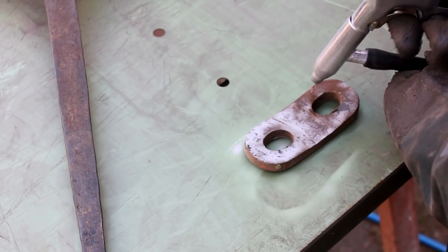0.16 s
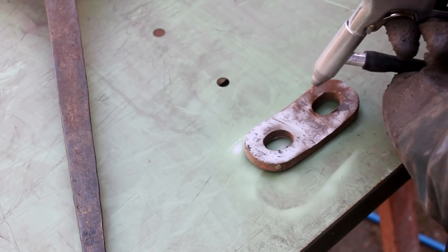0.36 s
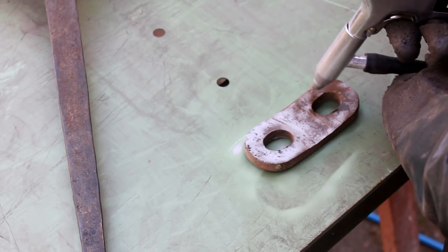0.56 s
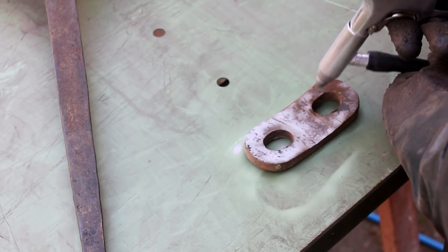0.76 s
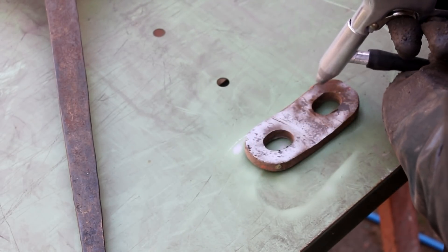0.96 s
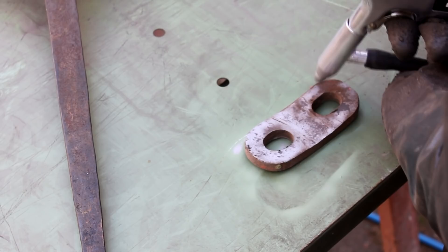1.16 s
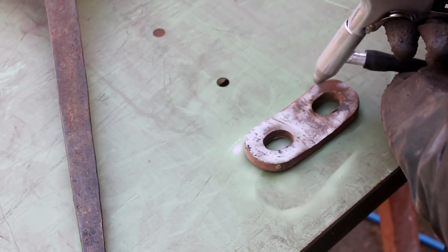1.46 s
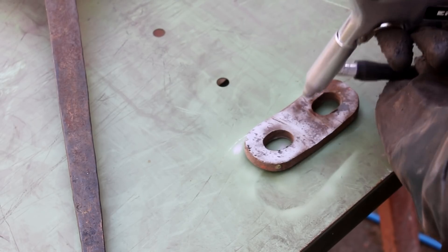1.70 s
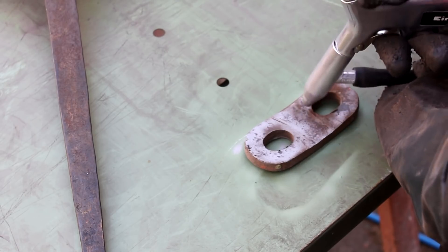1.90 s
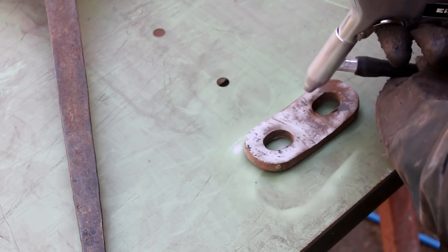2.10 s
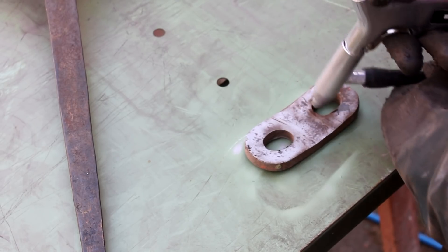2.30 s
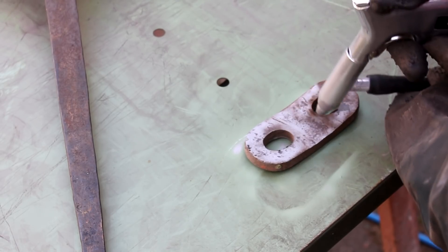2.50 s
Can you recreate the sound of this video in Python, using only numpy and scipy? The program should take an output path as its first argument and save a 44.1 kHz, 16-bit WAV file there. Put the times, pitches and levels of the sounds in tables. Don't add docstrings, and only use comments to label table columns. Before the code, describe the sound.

A sandblaster starts after a tenth of a second of quiet workshop murmur and a tiny trigger tick, then hisses continuously, bright and gritty, its tone shifting as the nozzle sweeps; close microphone, little echo.

```python
import sys
import numpy as np
from scipy import signal
from scipy.fft import rfft, irfft
from scipy.io import wavfile

SR = 44100
rng = np.random.default_rng(int(sys.argv[2]) if len(sys.argv) > 2 else 0)


def to_wav(sig):
    pcm = np.clip(np.atleast_2d(sig), -1, 1) * 32767
    pcm = np.round(pcm).astype(np.int16)
    wavfile.write(sys.argv[1], SR, pcm.T)


def gain_from_decibels(decibels):
    exponent = np.asarray(decibels, float) / 20
    return 10 ** exponent


N = 116865
OPEN_S = 0.1018


def evened(x):
    return x / np.sqrt(np.mean(x ** 2) + 1e-20)


def coloured(x, points):
    f, db = np.transpose(points)
    hz = np.fft.rfftfreq(len(x), 1 / SR)
    gain = gain_from_decibels(np.interp(np.log(hz + 1), np.log(f + 1), db))
    return evened(irfft(rfft(x) * gain, len(x)))


def track(table, column):
    rows = np.transpose(table)
    return np.interp(np.arange(N) / SR, rows[0], rows[column])


def drift(top_hz):
    t = np.arange(0, N + 64, 64) / SR
    wave = 0
    for f in np.geomspace(3, top_hz, 24):
        wave = wave + np.sin(2 * np.pi * (f * t + rng.random())) / np.sqrt(f)
    return np.interp(np.arange(N) / SR, t, evened(wave))


def ringing_air(hz, width_hz, level_db):
    turn = np.exp(2j * np.pi * np.cumsum(hz) / SR)
    r = np.exp(-np.pi * width_hz / SR)
    smooth = signal.lfilter([1], np.poly([r, r, r]), rng.standard_normal(N) / turn)
    return evened((turn * smooth).real) * gain_from_decibels(level_db)


def turbulence(points, level_db, gust_db):
    return coloured(rng.standard_normal(N), points) * gain_from_decibels(level_db + gust_db * drift(top_hz=50.24))


# frequency in Hz, level in dB.
ROOM_COLOUR = [(25, -11), (60, -1), (100, -4), (300, 2.5), (500, -10.5), (950, -9.5), (2470, -31.5),
               (15500, -50)]


def room_air():
    return gain_from_decibels(-64.5) * coloured(rng.standard_normal(N), ROOM_COLOUR)


# frequency in Hz, level in dB.
MACHINES = [(94, -72.5), (280, -73.5), (409, -77.5), (5400, -97)]


def machine_hum():
    t = np.arange(N) / SR
    out = np.zeros(N)
    for hz, db in MACHINES:
        out += gain_from_decibels(db + 2.7 * drift(top_hz=20)) * np.sqrt(2) * np.sin(2 * np.pi * hz * t)
    return out


# middle in seconds, level in dB.
TRIGGER_TICKS = [
    (.039, -83),
    (.042, -79),
]


def trigger_ticks():
    t = np.arange(N) / SR
    colour = [(2000, -20), (9000, -4.0), (12000, -8.5), (15000, -20)]
    tick = coloured(rng.standard_normal(N), colour)
    return tick * sum(gain_from_decibels(db - 60 * abs(t - s) / 0.0048) for s, db in TRIGGER_TICKS)


def valve():
    t = np.arange(N) / SR
    leak_s, leak_db, rise_s = 0.099, -28.5, 0.004
    surge_db, surge_s = 3.5, 0.012
    opening = np.clip((t - OPEN_S) / rise_s, 0, 1) ** 2
    leak = gain_from_decibels(leak_db) * np.clip((t - leak_s) / rise_s, 0, 1)
    surge = surge_db * np.exp(-np.maximum(t - OPEN_S - rise_s, 0) / surge_s)
    return (opening + leak) * gain_from_decibels(surge)


# time in seconds, level in dB.
BUFFET_LEVEL = [(0.13, -58), (0.21, -53), (0.26, -58), (0.3, -52), (0.32, -58), (0.72, -55.5), (0.86, -62),
                (0.88, -55), (0.92, -70), (0.97, -59.5), (1.15, -67), (1.16, -58.5), (1.39, -61.5),
                (1.58, -70), (1.72, -57.5), (2.12, -62.5), (2.34, -53), (2.65, -61)]
# frequency in Hz, level in dB.
BUFFET_COLOUR = [(30, -36), (70, -10), (120, -1), (400, 0.5), (800, -3.5), (1600, -21)]


def buffet():
    return turbulence(BUFFET_COLOUR, track(BUFFET_LEVEL, column=1) - 1, gust_db=1.97)


# frequency in Hz, level in dB.
SPLASH_COLOUR = [(120, -25), (400, -8.5), (1000, -3.5), (2500, -3.5), (6000, -32.5)]
# time in seconds, splash level in dB, grit level in dB, jet level in dB.
NOZZLE_SWEEP = [(0.13, -52, -47, -43), (0.23, -45, -40, -47), (0.25, -51, -47, -44.5),
                (0.31, -49, -37, -44), (0.4, -51.5, -41.5, -44), (0.58, -52, -39, -47.5),
                (0.66, -49.5, -40.5, -45), (0.9, -60, -48.5, -45.5), (1.16, -58.5, -49, -46),
                (1.41, -54.5, -50, -45.5), (1.58, -65, -49, -48), (1.63, -57, -44.5, -47),
                (1.71, -49, -39, -46), (2.05, -53, -44.5, -46), (2.1, -55, -45.5, -45),
                (2.37, -48, -43, -46), (2.49, -56, -39, -45.5), (2.65, -52, -47, -48.5)]


def splash():
    return turbulence(SPLASH_COLOUR, track(NOZZLE_SWEEP, column=1), gust_db=1.0)


# frequency in Hz, level in dB.
JET_COLOUR = [(100, -38), (400, -23.5), (900, -11), (2000, -6), (3200, -5), (5000, -3.5), (12500, -14),
              (15000, -25)]


def jet():
    return turbulence(JET_COLOUR, track(NOZZLE_SWEEP, column=3) + 2.5, gust_db=0.44)


# frequency in Hz, level in dB.
GRIT_COLOUR = [(3000, -27), (8000, -16), (11500, 5), (13500, 8), (14500, 1), (15700, -35)]


def grit():
    grains_per_s, spread_db = 16000, 0.5
    hits = (rng.random(N) < grains_per_s / SR) * rng.standard_normal(N)
    hits = hits * gain_from_decibels(spread_db * np.minimum(rng.exponential(1, N), 4))
    strikes = coloured(hits + 1.7 * rng.standard_normal(N), GRIT_COLOUR)
    return strikes * gain_from_decibels(track(NOZZLE_SWEEP, column=2) - 2 + 0.78 * drift(top_hz=38.1))


# time in seconds, level in dB, centre in Hz.
LOW_GAP = [(0.13, -40, 4130), (0.2, -40.5, 4180), (0.42, -39.5, 4500), (0.59, -39.5, 4500),
           (0.66, -36, 4530), (0.87, -38, 5040), (1.6, -38.5, 4940), (1.71, -43.5, 5000), (1.83, -43, 4600),
           (2.0, -46.5, 4700), (2.17, -40.5, 4900), (2.28, -38, 4470), (2.35, -35.5, 4640),
           (2.5, -46, 4450), (2.65, -35.5, 4530)]
# time in seconds, level in dB, centre in Hz.
MIDDLE_GAP = [(0.13, -38.5, 7700), (0.31, -40, 8000), (0.37, -40, 7500), (0.66, -39.5, 7660),
              (0.94, -38.5, 7700), (1.36, -42, 7300), (1.41, -40, 7600), (1.53, -43.5, 7500),
              (1.63, -43.5, 8000), (1.72, -37, 7600), (1.88, -34.5, 7170), (2.14, -38.5, 7870),
              (2.34, -40.5, 7060), (2.45, -39.5, 7500), (2.56, -42, 7600), (2.64, -38.5, 7000),
              (2.65, -41, 7160)]
# time in seconds, level in dB, centre in Hz.
HIGH_GAP = [(0.13, -39.5, 9830), (0.16, -35.5, 10200), (0.23, -37, 10000), (0.33, -35.5, 10300),
            (0.44, -41, 10400), (0.58, -38.5, 10200), (0.67, -44, 9700), (0.97, -46, 10340),
            (1.39, -41.5, 10640), (1.58, -48.5, 10700), (1.62, -43.5, 11000), (1.73, -42.5, 10500),
            (1.84, -49, 9700), (1.88, -41.5, 10500), (2.33, -45, 10100), (2.39, -37.5, 10700),
            (2.49, -37.5, 10500), (2.65, -39, 10800)]


def moving_gaps():
    out = np.zeros(N)
    # resonance, width in Hz, level in dB
    for rows, width_hz, db in ((LOW_GAP, 2300, -0.34), (MIDDLE_GAP, 2800, 0.5), (HIGH_GAP, 2750, -0.84)):
        centre_hz = track(rows, column=2) * (1 + 0.012 * drift(top_hz=15))
        level_db = db + track(rows, column=1) + 0.24 * drift(top_hz=40)
        out += ringing_air(centre_hz, width_hz, level_db)
    return out


# time in seconds, level in dB.
LOWER_RING = [(0.13, -41.5), (0.32, -40.5), (0.33, -52), (0.35, -37.5), (0.75, -42), (0.83, -37.5),
              (1.55, -39), (1.68, -45), (1.89, -46), (2.05, -46), (2.34, -40.5), (2.53, -62), (2.64, -47),
              (2.65, -51)]
# time in seconds, level in dB.
UPPER_RING = [(0.11, -32.5), (0.125, -41.5), (0.22, -36.5), (0.45, -43), (0.56, -41.5), (1.06, -49),
              (1.08, -43.5), (1.63, -51), (1.72, -42), (1.88, -62), (2.32, -39.5), (2.33, -52),
              (2.39, -41.5), (2.65, -46)]


def fixed_gaps():
    lower = ringing_air(np.full(N, 6220), 2080, track(LOWER_RING, column=1) - 2)
    upper = ringing_air(np.full(N, 9070), 1700, track(UPPER_RING, column=1) - 1.5)
    return lower + upper


# time in seconds, level in dB, centre in Hz.
DUST = [(0.13, -52, 15200), (0.28, -52, 15200), (0.34, -49, 15200), (0.8, -48, 15200), (0.86, -52, 15200),
        (1.17, -55, 15200), (1.18, -52, 15200), (1.36, -48, 15200), (1.53, -56, 15200), (1.72, -46, 15200),
        (2.05, -53, 15200), (2.16, -47, 15200), (2.2, -50, 15200), (2.3, -45, 15200), (2.38, -49, 15200),
        (2.46, -44, 15300), (2.59, -49, 15200), (2.65, -53, 15200)]


def dust_fizz():
    return ringing_air(track(DUST, column=2), 4200, track(DUST, column=1) + 1.5)


# time in seconds, level in dB, centre in Hz.
UNDERSIDE = [(0.13, -45, 3030), (0.54, -41, 3150), (0.56, -48, 3020), (0.66, -42, 3150), (0.89, -47, 3100),
             (2.03, -48, 2880), (2.25, -46, 2980), (2.29, -58, 3000), (2.33, -44.5, 3040),
             (2.64, -45.5, 3100), (2.65, -46, 3000)]


def spreading_air():
    return ringing_air(track(UNDERSIDE, column=2), 2400, track(UNDERSIDE, column=1) - 4)


# time in seconds, level in dB, centre in Hz.
RIM_REBOUND = [(0.13, -46, 12100), (0.16, -41, 12100), (0.36, -40, 12100), (0.41, -47, 12100),
               (0.6, -44, 12100), (0.65, -48, 12100), (0.7, -46, 12100), (0.94, -50, 12000),
               (1.43, -49, 12100), (1.47, -52, 12100), (1.72, -48, 12200), (2.08, -47, 12100),
               (2.34, -44, 12000), (2.42, -40, 12100), (2.64, -48, 12100), (2.65, -48, 12100)]


def rim_rebound():
    return ringing_air(track(RIM_REBOUND, column=2), 2600, track(RIM_REBOUND, column=1) - 3.5)


# centre in Hz, width in Hz, gain in dB.
REFLECTIONS = [(3200, 500, 1.5), (4950, 450, 2.1), (5450, 300, -.7), (6650, 300, -1.5), (8250, 400, 1.5),
               (9350, 500, -2.5), (10900, 500, 1.5), (11800, 500, -1.5), (12400, 400, 1.5),
               (13600, 600, 1.8), (14700, 900, .3)]


def reflected(x):
    hz = np.fft.rfftfreq(N, 1 / SR)
    gain_db = sum(db * np.exp(-(2 * (hz - f) / width) ** 2) for f, width, db in REFLECTIONS)
    return irfft(rfft(x) * gain_from_decibels(gain_db), N)


# middle in seconds, length in seconds, centre in Hz, depth from 0 to 1.
CANCELLATIONS = [
    (1.2, 0.55, 9300, 0.2),
    (2.08, .36, 9300, 0.4),
    (1.88, .12, 11200, .4),
    (2.07, .14, 11300, .5),
    (2.55, .16, 6200, 0.3),
]


def cancelled(x):
    t = np.arange(N) / SR
    width_hz = 600
    for s, length, hz, depth in CANCELLATIONS:
        band = signal.lfilter(*signal.iirpeak(hz, hz / width_hz, fs=SR), x)
        x = x - np.clip(depth, 0, 1) * np.exp(-(2 * (t - s) / length) ** 4) * band
    return x


def scene():
    workshop = room_air() + machine_hum() + trigger_ticks()
    rings = moving_gaps() + fixed_gaps() + dust_fizz() + spreading_air() + rim_rebound()
    rings = signal.lfilter(*signal.butter(2, 1430, "high", fs=SR), rings)
    blast = buffet() + splash() + jet() + grit() + rings
    blast = valve() * cancelled(reflected(blast))
    duck_db, duck_s = -9.5, 0.17
    since_open = np.maximum(np.arange(N) / SR - OPEN_S, 0)
    workshop = workshop * gain_from_decibels(duck_db * (1 - np.exp(-since_open / duck_s)))
    mono = blast + workshop
    return np.array([mono, mono])


# time in seconds, low edge in Hz, high edge in Hz.
WIDE_PATCHES = [(.165, 5170, 6290), (.165, 12400, 14470), (.281, 14470, 15830), (.351, 4220, 5680),
                (.42, 11020, 12400), (.467, 4220, 5170), (.467, 13780, 15830), (.49, 5170, 6290),
                (.513, 8960, 10340), (.513, 11020, 12400), (.606, 4220, 5170), (.653, 14470, 15830),
                (.745, 5680, 6890), (.745, 13780, 15160), (.769, 6290, 7580), (.769, 10340, 11710),
                (.908, 4650, 5680), (.908, 6290, 7580), (1.047, 8270, 9650), (1.465, 4650, 5680),
                (1.744, 5680, 6890), (1.744, 9650, 11020), (1.906, 11020, 13090), (2.115, 5680, 7580),
                (2.115, 10340, 11710), (2.255, 4650, 5680), (2.278, 4650, 5680), (2.51, 5170, 6290),
                (2.51, 7580, 9650), (2.557, 6290, 9650)]


def left_right_patches(x):
    size, first = 2048, 107
    half, out = size // 2, np.zeros(N + size)
    window = np.sin(np.pi * (np.arange(size) + 0.5) / size)
    noise = rng.standard_normal((len(WIDE_PATCHES), half))
    for (s, low_hz, high_hz), z in zip(WIDE_PATCHES, noise):
        at = first + half * (round((s * SR - first) / half) - 1)
        k = np.arange(round(low_hz * size / SR), round(high_hz * size / SR))
        phase = np.outer(k + 0.5, np.arange(size) + 0.5 + half / 2)
        waves = window * np.cos(np.pi / half * phase)
        level = np.sqrt(np.mean((waves @ x[at:at + size]) ** 2))
        out[at:at + size] += 2 / half * level * evened(z[k]) @ waves
    return out[:N]


def band_limit(x):
    return signal.sosfilt(signal.butter(12, 15830, fs=SR, output="sos"), x)


def record(dry):
    mono = signal.lfilter(*signal.butter(2, 35, "high", fs=SR), dry[0])
    ceiling = 0.115
    mono = ceiling * np.tanh(mono / ceiling)
    top = signal.firwin(401, 15780, window=("kaiser", 8), fs=SR)
    mono = signal.oaconvolve(mono, top, "same")
    side = gain_from_decibels(-2.5) * left_right_patches(mono)
    return band_limit(np.array([mono + side, mono - side]))


dry = scene()
out = record(dry)
to_wav(out)
```